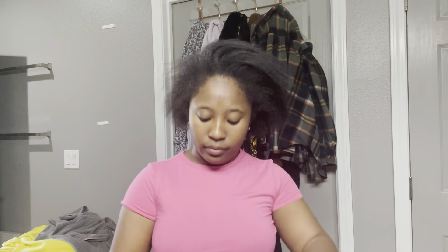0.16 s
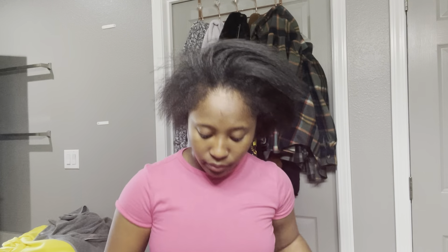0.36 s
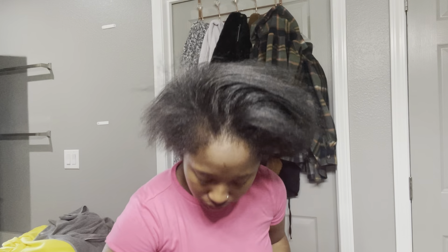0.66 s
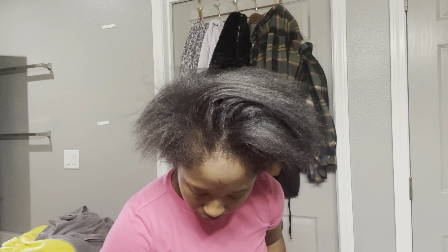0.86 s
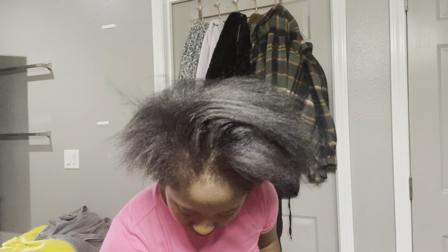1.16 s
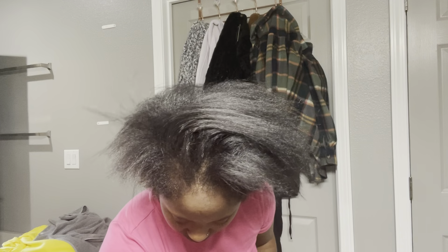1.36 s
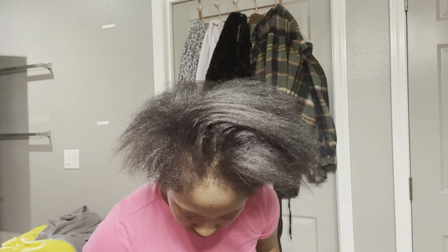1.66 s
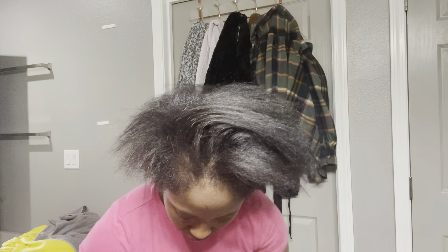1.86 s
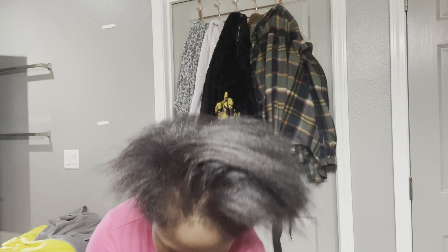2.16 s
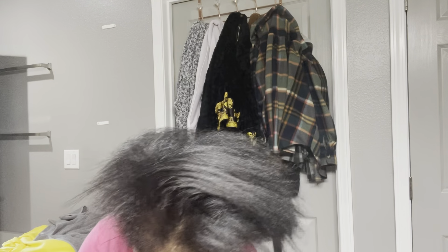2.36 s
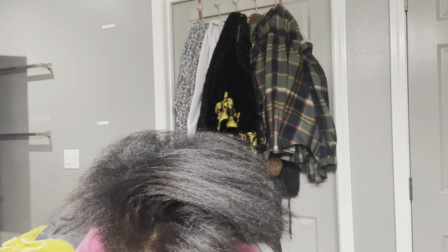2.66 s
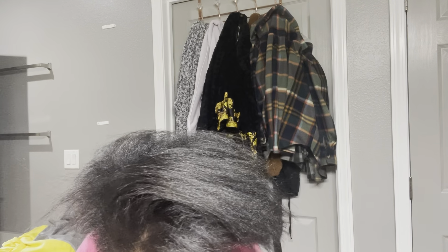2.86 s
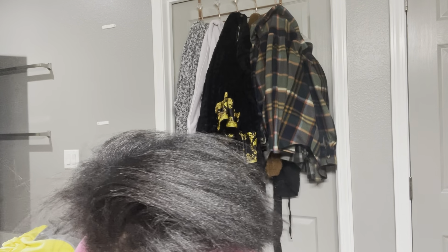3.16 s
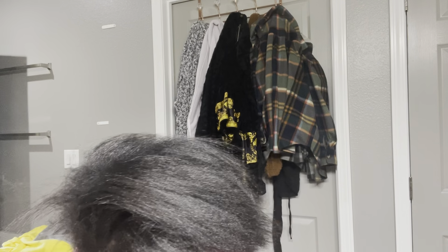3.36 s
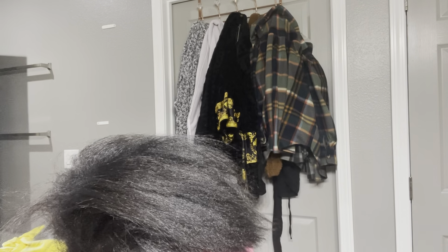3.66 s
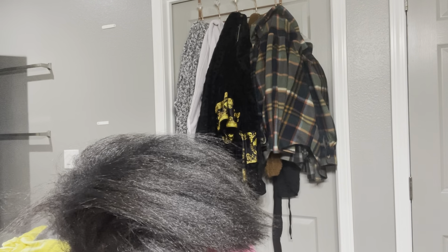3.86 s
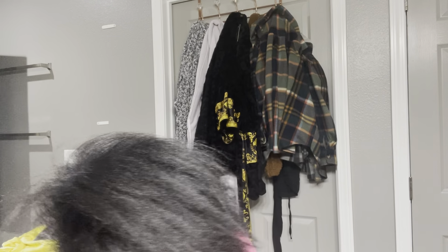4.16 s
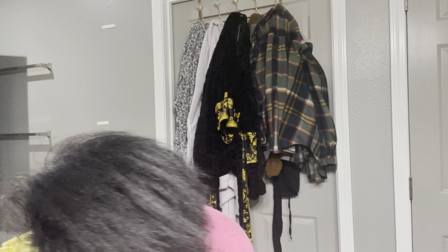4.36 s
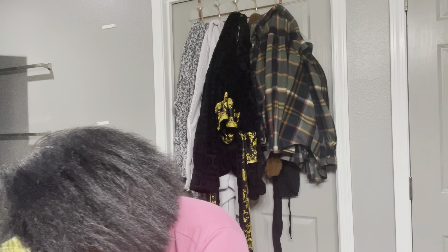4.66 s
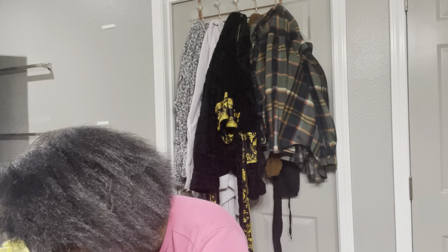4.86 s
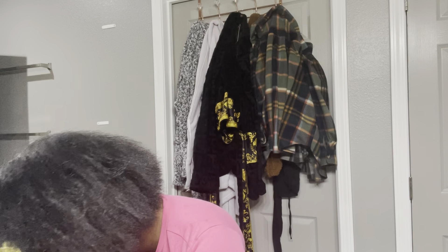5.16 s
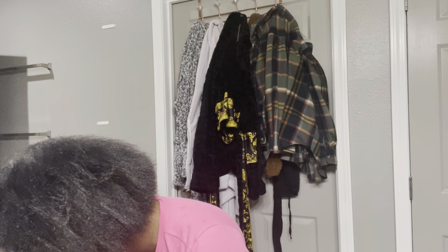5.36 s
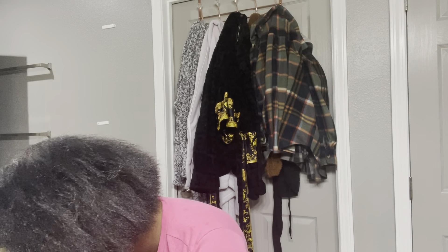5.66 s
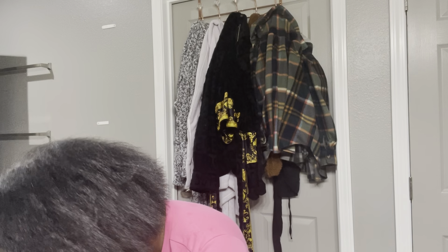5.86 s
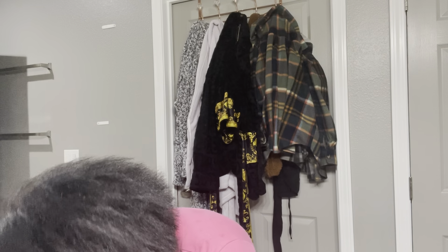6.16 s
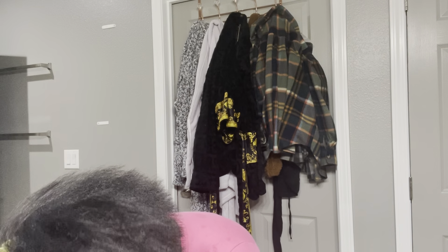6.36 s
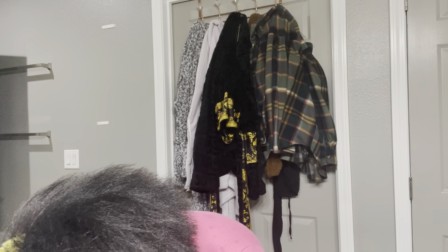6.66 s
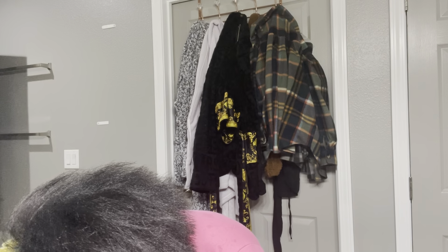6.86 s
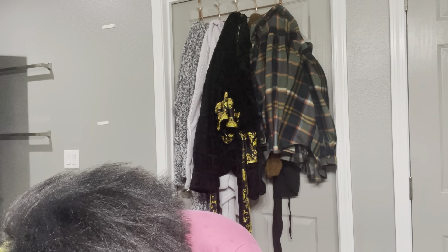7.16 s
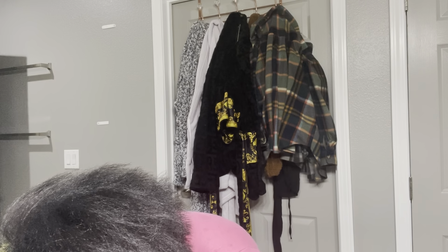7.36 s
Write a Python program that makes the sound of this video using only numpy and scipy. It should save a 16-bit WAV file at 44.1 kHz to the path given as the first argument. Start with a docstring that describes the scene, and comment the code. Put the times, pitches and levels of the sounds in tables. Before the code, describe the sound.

Plastic items knock and click sparsely, then rummage in busy clusters inside a hollow cabinet, with rustles and hard bangs in a small room.

```python
"""Rummaging in a bathroom cabinet

Someone rummages in a bathroom cabinet near a phone: plastic things knock and click as short noise bursts
with a ring, small glass or metal things clink as dying sines, and things slide as clumps of small grains.
The hollow cabinet booms under them through a bank of resonances, and the small hard room rings for half
a second through random echoes. Filtered noise makes the building hum and microphone hiss behind it all."""
import sys
import numpy as np
from scipy import signal
from scipy.fft import rfft, irfft, next_fast_len
from scipy.io import wavfile
from scipy.ndimage import uniform_filter1d

SR = 44100
rng = np.random.default_rng(int(sys.argv[2]) if len(sys.argv) > 2 else 0)


def to_wav(sig):
    """Store sig (one row per channel, or 1-D mono) as 16-bit WAV at the path in sys.argv[1].

    Samples outside -1..1 are clipped; the rate is SR.
    """
    pcm = np.clip(np.atleast_2d(sig), -1, 1) * 32767
    pcm = np.round(pcm).astype(np.int16)
    wavfile.write(sys.argv[1], SR, pcm.T)  # frames by channels


N = 330750  # samples, 7.5 s

# Knocks and clicks inside the cabinet, before it and the room answer. Each row: start in seconds, peak of
# the struck thing in dB, its pitch in Hz, gain of its ring in dB, cabinet thump in dB re that peak,
# thump pitch in Hz, tick in dB re that peak.
KNOCKS = [(0.516, -46.5, 505, 14, 4, 293, 11), (0.56, -48, 520, 5, 5.5, 294, -1),
          (0.729, -29.5, 1635, 4.5, -0.5, 274, -6), (0.744, -27.5, 908, 14, -1.5, 287, -29),
          (0.79, -38, 1410, 17, 2, 294, -42), (1.251, -44, 775, 0, -10, 253, -22),
          (1.648, -62, 500, 3, 17.5, 270, -42), (1.934, -46, 537, 22, -28, 250, -22),
          (2.051, -34, 1875, 12, -10, 192, -6), (2.158, -35.5, 936, 16, -34, 107, 10),
          (2.201, -33.5, 1070, 2, -3, 250, -6), (2.275, -30.5, 2350, -3.5, -17, 245, -4),
          (2.397, -60, 1000, 3, -5, 164, 19), (2.409, -38, 2850, -1, -25, 163, 4.5),
          (2.45, -15.5, 987, 8.5, -11.5, 285, -22.5), (2.451, -27, 2100, 9, -20, 286.5, -1),
          (2.489, -31, 717, 36, -38, 112, 3), (2.637, -48, 770, 16, 3, 118, -23),
          (2.77, -60.5, 690, 3, 6, 104, 30.5), (2.881, -54, 850, 1, -28, 94, 21),
          (3.1, -72, 873, 3, -30, 93, 19), (3.128, -39.5, 476, 10, -2, 242, -2.5),
          (3.277, -39.5, 1600, 13, -34, 134, -2), (3.294, -37.5, 2300, 9, -22, 107, 4),
          (3.324, -34, 1750, 6, -24, 244, -4), (3.34, -28, 686, 38, -9.5, 252, -7),
          (3.366, -30.5, 1890, 4, -1, 244, -9), (3.399, -28.5, 588, 12, -16, 243, -3),
          (3.494, -30.5, 484, 23, -33, 112, -3), (3.535, -34, 960, 0, -14, 123, -6),
          (3.543, -26.5, 1280, 25, -39, 122, 0), (3.569, -31.5, 1770, 23, -12, 120, 0),
          (3.584, -34, 1820, 23, -9, 103, 4.5), (3.669, -39.5, 1810, 3, -20, 120, 24.5),
          (3.67, -21, 1020, 5.5, -18, 122, -5), (4.005, -43.5, 1570, 6, -30, 123, 3.5),
          (4.145, -48.5, 1000, 1, 0, 120, 11), (4.184, -29.5, 734, 14, -1, 247, -4.5),
          (4.458, -49, 1610, 10, -36, 109, 14), (4.751, -41, 1090, 7, -3, 353, -46),
          (4.768, -33.5, 676, 14.5, -5, 130, -52), (4.797, -44, 770, 18, -1, 360, -44),
          (4.885, -49, 640, 3, 10.5, 126, -20), (4.878, -37, 2030, 16, -1, 239, 6),
          (5.098, -49.5, 510, 19, 9.5, 217, -15), (5.312, -40.5, 676, 15, 1.5, 123, -14),
          (5.363, -35, 1020, 17, 9.5, 245, -33), (5.389, -17, 590, 8, -2, 272, -15),
          (5.394, -11.5, 980, 2.5, -3, 145, -11), (5.456, -12.5, 672, 18, 2, 405, -16),
          (5.482, -8.5, 905, 2.5, -1.5, 278, -8.5), (5.485, -19.5, 1630, -7, 0.5, 135, -11),
          (5.544, -33.5, 413, 0, 15, 238, -35), (5.911, -47.5, 900, 5, -22, 250, -2),
          (5.95, -28.5, 1140, 9, -10, 287, 6.5), (5.968, -22, 1107, 25, -37, 254, -0.5),
          (5.974, -21, 1720, 6, -2, 251, -44), (6.001, -24, 1460, 28, -15, 255, -33),
          (6.272, -30, 483.5, 34, -16, 111, -1), (6.274, -26, 1105, 3, -30, 113, -10),
          (6.314, -30.5, 920, 16, -13, 111, -1), (6.348, -33, 1380, 12, -27, 111, 6.5),
          (6.385, -45, 577, 3, 12, 120, -10), (6.413, -31.5, 1040, 15, -30, 120, 12),
          (6.432, -26.5, 1170, 2, -13, 122, -5), (6.51, -47, 520, 6, 10, 227, 22),
          (6.479, -31.5, 510, 15, 4, 131, -4), (6.648, -38, 540, 3, -13, 252, -11),
          (6.703, -38, 1450, 1, -30, 108, 13.5), (6.738, -27.5, 862, 18, -9, 125, -37),
          (6.879, -45, 810, 28, -14, 105, 8), (6.966, -38, 1430, -4, -5, 252, -8),
          (6.998, -44, 1720, 10, -6, 237, 8), (7.031, -30, 1230, 4, -29, 131.4, -7),
          (7.08, -30, 1740, 7.5, -3, 250, -19), (7.235, -29.5, 528, 11, -16, 117, -9)]
CONTACT_S = 0.0049  # decay time constant of a blow's noise envelope
RING_WIDTH_HZ, RING_SPREAD = 24.6, 1.37  # width of a 500 Hz ring; exponent by which higher ones widen
CLACK_DB, CLACK_PER_TICK, HARD_DB = -2, 0.53, -3  # the clack grows with the tick, up to a hard blow
# Tick band edges for a tick of 0 dB; the more a blow is all tick, the higher the tick.
TICK_HZ, TICK_TOP_HZ, TICK_OCTAVES_PER_DB = 2730, 14800, 0.045


def knocks():
    """Each blow: a thump of a cycle or two, a short ring of the struck thing, a hard clack and a bright tick."""
    out, t = np.zeros(N), np.arange(4096) / SR
    shape = (1 - np.exp(-t / (0.35 * CONTACT_S))) * np.exp(-t / CONTACT_S)
    snap = (1 - np.exp(-t / (0.064 * CONTACT_S))) * np.exp(-t / (0.43 * CONTACT_S))
    blows = zip(KNOCKS, bursts(shape), bursts(shape), bursts(snap))
    for (s, db, hz, ring_db, thump_db, thump_hz, tick_db), blow, hard, high in blows:
        swing = t * np.exp(-t * thump_hz / 0.71) * np.sin(2 * np.pi * thump_hz * t)
        thump = band(swing, 74, 1170)

        ring = resonate(blow, hz, RING_WIDTH_HZ * (hz / 500) ** RING_SPREAD)
        body = band(band(blow, 338, 1370), 350, 2290) + gain_of(ring_db) * ring

        clack = band(band(hard, 980, 2380), 950, 4130)
        clack_db = CLACK_DB + CLACK_PER_TICK * min(tick_db - HARD_DB, 0)

        lift = 2 ** (TICK_OCTAVES_PER_DB * np.clip(tick_db, -12, 20))
        tick = band(high, TICK_HZ * lift, min(TICK_TOP_HZ * lift ** 2, 0.45 * SR))

        # each part is scaled to its own peak level
        for part, part_db in ((thump, thump_db), (body, 0), (clack, clack_db), (tick, tick_db)):
            add(out, s, gain_of(db + part_db) * part / abs(part).max())
    return out


def bursts(shape):
    """One short burst of noise per blow, its colour evened so that no pitch stands out."""
    spectra = rfft(rng.standard_normal((len(KNOCKS), len(shape))) * shape)
    smooth_power = uniform_filter1d(abs(spectra) ** 2, size=7)
    return irfft(spectra / np.sqrt(smooth_power)) * np.sqrt(shape)


# Things dragged and rustled on the shelves, one row a stroke. Each row: start in seconds, time held in
# seconds, scraping in dB, rumble in dB re scraping, crisp rustle in dB re scraping.
STROKES = [(0.0, 0.031, -89.5, -12, 11.5), (0.531, 0.39, -66, 3.5, -2), (0.77, 0.011, -61, -4, -22),
           (1.27, 0.058, -68.5, 11, -8), (1.428, 0.012, -65, 5, -6.5), (1.55, 0.038, -74, -3, -4),
           (1.662, 0.074, -83.5, 19.5, -2), (1.825, 0.065, -73.5, 11.5, -10),
           (1.93, 0.037, -66.5, -6, -4.5), (2.061, 0.2, -53, 0, -6.5), (2.33, 0.042, -57, 0, -4.5),
           (2.461, 0.18, -64, 16, -8.5), (2.782, 0.13, -65.5, 1, 3), (3.0, 0.35, -73.5, 0.5, 3.5),
           (3.333, 0.068, -50, 2.5, 0.5), (3.5, 0.11, -48, -3, -2.5), (3.64, 0.12, -50, 4, -3.5),
           (3.82, 0.019, -62, -1, -33), (3.93, 0.13, -61, 0, -11.5), (4.142, 0.074, -50, 4.5, -6),
           (4.3, 0.23, -63, 4, -10.5), (4.5, 0.17, -66.5, 6.5, -6.5), (4.78, 0.015, -68, 27, -16),
           (4.87, 0.046, -53, 0.5, -3), (4.999, 0.14, -57, 0.5, -9.5), (5.2, 0.28, -68.5, 8, -8.5),
           (5.508, 0.028, -43.5, 12, -21), (5.62, 0.08, -64, -11, -8), (5.74, 0.53, -63, 6.5, -9),
           (6.32, 0.024, -49.5, 3, -6), (6.42, 0.085, -45, 5.5, -1.5), (6.602, 0.18, -53, 9, 0.5),
           (6.9, 0.13, -55, 6.5, -3), (7.067, 0.059, -49.5, 0.5, -4.5), (7.199, 0.085, -56.5, 6, -6),
           (7.43, 0.01, -68, -7, 3.5)]
RISE_DB_PER_S, FALL_DB_PER_S = 346, 234  # swell before the start, fade after the hold
GRIT_DB, GRIT_SHARE = -4.5, 0.53  # the gritty middle follows the crisp rustle by this share


def rummage():
    """Friction slips in clumps of small grains; weight makes it boom, crisp wrappers make it fizz."""
    t, levels = np.arange(0, N + 64, 64) / SR, 0
    for s, held_s, db, rumble_db, rustle_db in STROKES:
        rise_db = RISE_DB_PER_S * np.maximum(s - t, 0)
        fall_db = FALL_DB_PER_S * np.maximum(t - s - held_s, 0)
        grit_db = GRIT_DB + GRIT_SHARE * rustle_db
        band_db = np.array([[rumble_db], [0], [grit_db], [rustle_db]])
        levels = levels + gain_of(db + band_db - rise_db - fall_db)

    # one slow random wave bunches the two low bands, another the two high ones
    smooth = uniform_filter1d(rng.standard_normal((2, N)), 300)
    clumps = evened(uniform_filter1d(smooth, 300))
    edges = ((80, 436), (330, 1700), (1100, 3920), (2600, 18100))  # rumble, scraping, grit, rustle in Hz
    out = 0
    for k, (level, (lo_hz, hi_hz)) in enumerate(zip(levels, edges)):
        grains = band(band(slips(clumps[k // 2]), lo_hz, hi_hz), lo_hz, hi_hz)
        out = out + np.interp(np.arange(N) / SR, t, level) * evened(grains)
    return out


def slips(clumps):
    """Sparse grains, about 1500 a second, of random sign and size; the clumps make them swell together."""
    size_db = 4.3 * np.minimum(rng.exponential(1, N), 4.5) + 5 * clumps
    happens = rng.random(N) < 1500 / SR
    return gain_of(size_db) * happens * rng.choice([-1., 1.], N)


# Small glass or metal things touching. Each row: start in seconds, peak in dB, pitch in Hz.
CLINKS = [(2.771, -62, 7300), (3.545, -42, 7800), (6.41, -35, 6630), (6.413, -28.5, 7420)]
CLINK_T60_S = 0.04  # time to fall by 60 dB


def clinks():
    """A thin high ring that dies quickly."""
    out, t = np.zeros(N), np.arange(8192) / SR
    for s, db, hz in CLINKS:
        add(out, s, gain_of(db - 60 * t / CLINK_T60_S) * np.sin(2 * np.pi * hz * t))
    return out


# Ringing modes of the cabinet and its shelves. Each row: pitch in Hz, width in Hz, level in dB.
CABINET = [(112, 14.3, 11), (178.8, 12.3, -1), (241.2, 39.6, 3), (306, 13, 0), (354.7, 14, 1), (502, 35, 3),
           (610, 122, 3), (762, 85, 0), (883, 20.5, 5), (1010, 82, -7.5)]


def cabinet(x):
    """The panels add their modes to whatever shakes them."""
    return x + sum(gain_of(db) * resonate(x, hz, width) for hz, width, db in CABINET)


def room(x):
    """Three random sets of echoes take turns, blending smoothly 1.3 times a second.

    The room's colour and left-right delays so keep shifting."""
    turn = 2 * np.pi * np.arange(N) / SR * 1.3
    out = 0
    for k in range(3):
        share = np.sqrt((1 + np.cos(turn + 2 * np.pi * k / 3)) / 3)  # the three powers sum to one
        out = out + signal.oaconvolve((share * x)[None], echoes(), axes=1)[:, :N]
    return out


# How long the small hard room rings. Each row: frequency in Hz, time to fall by 60 dB in seconds.
ROOM = [(100, 0.27), (260, 0.36), (700, 0.52), (1840, 0.38), (4850, 0.37), (10000, 0.27), (14000, 0.036)]


def echoes():
    """Direct sound, strong near echoes, then a tail whose bands die at their own speed; other taps per side."""
    # one echo of random sign at a random place in every 20 samples
    taps = np.zeros((2, SR))
    at = np.arange(100, SR - 20, 20) + rng.integers(0, 20, (2, (SR - 101) // 20))
    np.put_along_axis(taps, at, rng.choice([-1., 1.], at.shape), 1)
    taps *= 1 + 0.42 * np.exp(-np.arange(SR) / SR / 0.044)  # close walls and the counter answer first

    hz, t, z = signal.stft(taps, SR, nperseg=256)
    decay = gain_of(-60 * t / read(ROOM, hz)[:, None])
    tail = signal.istft(z * decay, SR, nperseg=256)[1]
    tail *= gain_of(3.5) / np.linalg.norm(tail, axis=1, keepdims=True)  # dB re the direct sound
    tail[[0, 1], rng.integers(0, 12, 2)] = 1  # direct sound, up to 11 samples late on each side

    paths = rfft(tail)
    paths *= gain_of(4.0) / np.sqrt(uniform_filter1d(abs(paths) ** 2, size=30))  # no band is favoured
    return irfft(paths)[:, :SR * 3 // 4]


# Building hum and microphone hiss, as a relative spectrum. Each row: frequency in Hz, density in dB per Hz.
FLOOR = [(15, -49), (30, -8), (64, 7.5), (97, -0.5), (123, 15.5), (145, -7), (277, -12.5), (476, -21.5),
         (1480, -32), (4610, -51.5), (8000, -38), (11000, -35.5)]
FLOOR_DB = -56  # rms before the microphone colour


def floor():
    """Steady noise, a lumpy hum at the bottom and hiss on top."""
    hz = np.fft.rfftfreq(N, 1 / SR)
    spectra = rfft(rng.standard_normal((2, N))) * gain_of(read(FLOOR, hz))
    return gain_of(FLOOR_DB) * evened(irfft(spectra, N))


def gain_of(db):
    """Amplitude factor of a level in dB."""
    return 10 ** (np.asarray(db) / 20)


def evened(x):
    """Scale to an rms of one."""
    return x / np.sqrt(np.mean(x ** 2) + 1e-20)


def read(points, hz):
    """Read a curve of (Hz, value) points along log frequency."""
    f, value = np.transpose(points)
    return np.interp(np.log(hz + 1), np.log(f + 1), value)


def add(mix, s, sound):
    """Lay a sound into the mix from s seconds on, cut at the end."""
    part = mix[round(s * SR):][:len(sound)]
    part += sound[:len(part)]


def band(x, lo_hz, hi_hz):
    """Keep the band between two edges, with gentle slopes."""
    return signal.sosfilt(signal.butter(2, [lo_hz, hi_hz], "bandpass", fs=SR, output="sos"), x)


def resonate(x, hz, width):
    """A two-pole resonance of gain 1 at its centre."""
    return signal.lfilter(*signal.iirpeak(hz, hz / width, SR), x)


def scene():
    """Everything that moves shakes the cabinet, which sounds in the room over the steady floor."""
    return room(cabinet(knocks() + clinks() + rummage())) + floor()


# Colour of the phone's microphone. Each row: frequency in Hz, gain in dB.
MIC = [(20, -0.5), (70, 3.5), (105, -3.5), (1000, -4.5), (3000, 4.5), (7000, 4), (11300, 0.5), (12200, -17),
       (14300, -14), (15900, -32)]
# What the two ports share. Each row: frequency in Hz, left-right likeness from 0 to 1.
ALIKE = [(20, 0.64), (150, 0.99), (300, 0.012), (600, 0.0048), (6300, 0.0037), (7500, 0.22), (8600, 1),
         (10000, 0.88), (11500, 0.57), (13000, 1)]
PORT_LAG_S = 0.0001755  # the right port hears the shared part this much later
EDGE_HZ = 16400  # low-pass edge


def record(dry):
    """Two ports share bass and treble, the right one a little late; microphone colour; band limit."""
    size = next_fast_len(N + 4096)
    hz = np.fft.rfftfreq(size, 1 / SR)
    left, right = rfft(dry, size)

    alike = np.clip(read(ALIKE, hz), 0, 1)
    late_left = left * np.exp(-2j * np.pi * hz * PORT_LAG_S)
    right = alike * late_left + np.sqrt(1 - alike ** 2) * right

    coloured = irfft(np.array([left, right]) * gain_of(read(MIC, hz)), size)[:, :N]
    low_pass = signal.firwin(511, EDGE_HZ, window=("kaiser", 9), fs=SR)
    return signal.oaconvolve(coloured, low_pass[None], "same")


dry = scene()
out = record(dry)
to_wav(out)
```